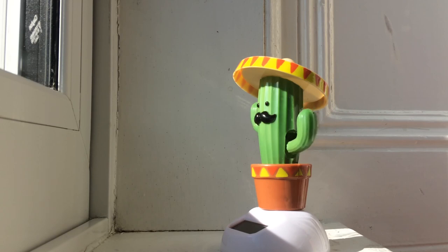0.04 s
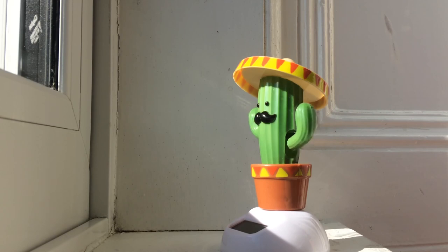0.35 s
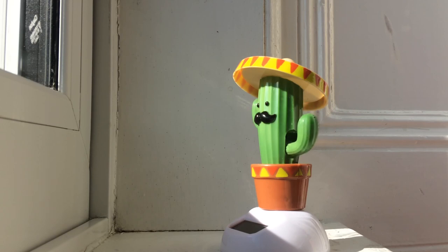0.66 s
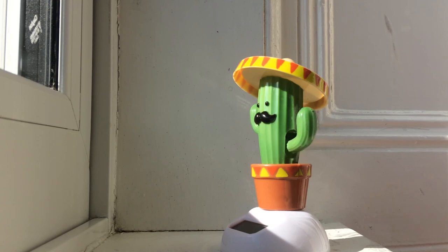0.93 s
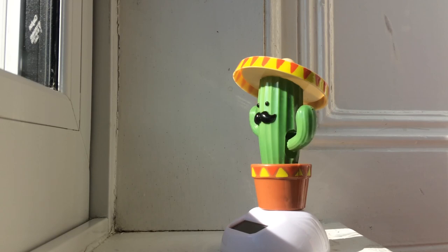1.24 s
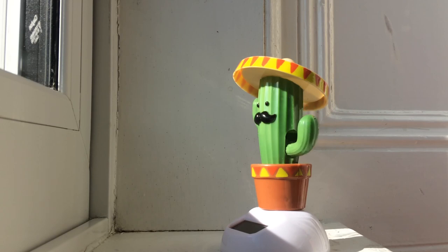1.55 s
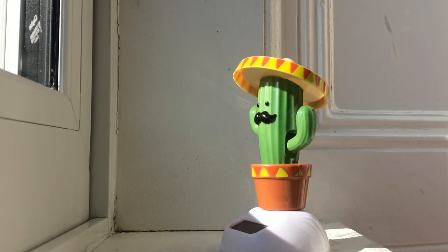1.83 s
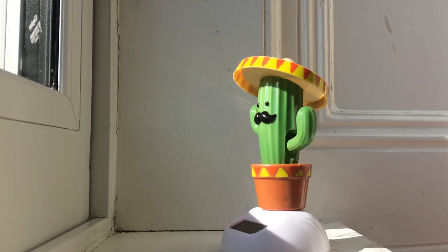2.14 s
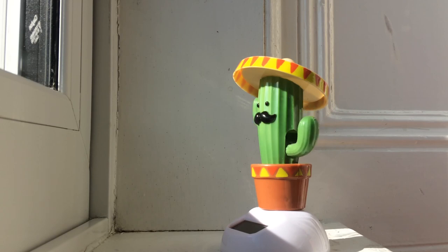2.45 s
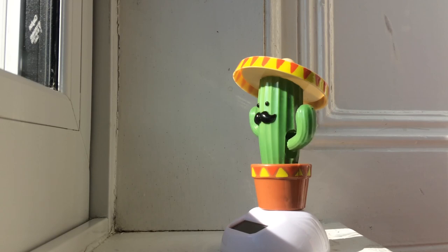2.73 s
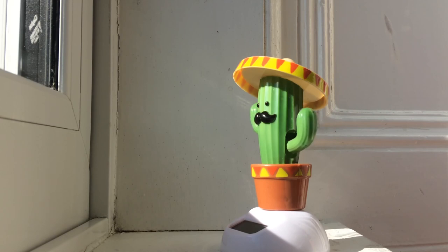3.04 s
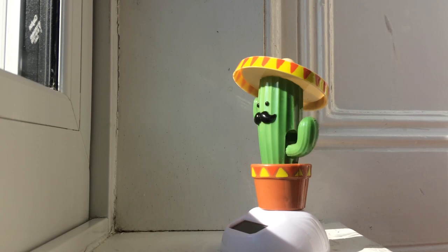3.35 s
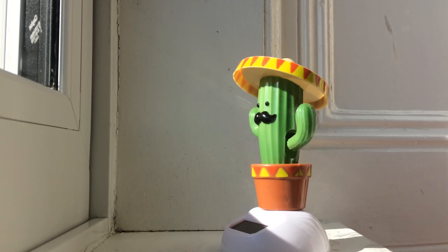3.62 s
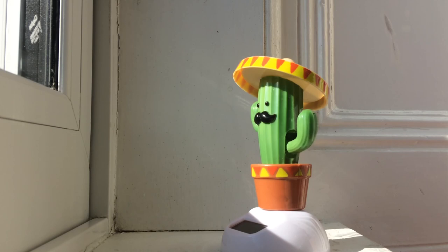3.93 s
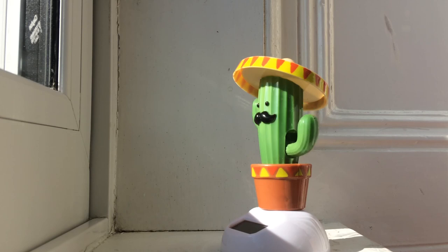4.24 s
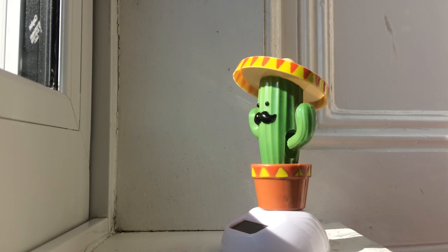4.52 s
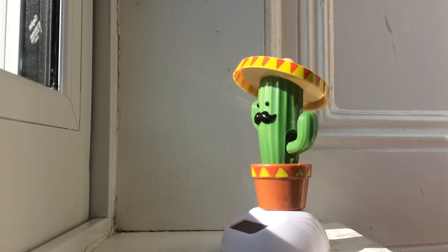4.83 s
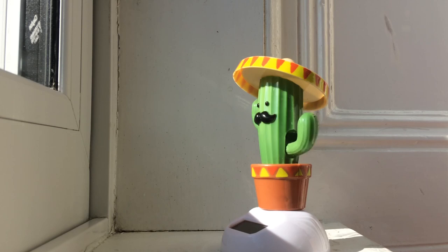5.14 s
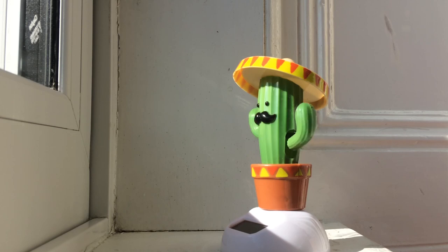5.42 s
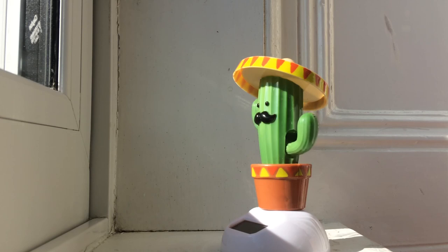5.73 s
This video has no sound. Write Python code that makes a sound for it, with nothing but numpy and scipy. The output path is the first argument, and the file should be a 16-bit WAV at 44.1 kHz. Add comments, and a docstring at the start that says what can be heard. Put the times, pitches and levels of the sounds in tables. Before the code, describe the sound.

A small solar-powered toy ticks on a windowsill in a quiet room, fairly close to the microphone. The light plastic clacks start at about 0.2 seconds and repeat evenly, a little over twice a second, each with a brief ring from the sill. Soft, low room tone lies underneath, and at first a faint drone and hiss come through an open doorway, gradually fading. Further off, from about 1.1 to 1.8 seconds, a door handle scrapes and rattles with metallic clicks, the sharpest near 1.7 seconds. At 2 seconds the door bumps its frame with a low boom and the metal latch immediately snaps home. This is the loudest moment, and the drone and hiss are gone. The door gives a faint, dull nudge around 2.7 seconds. The toy ticks on unchanged until the end, at about 6 seconds.

```python
"""A quiet room with a windowsill, where a solar dancing toy ticks a little over twice a second:
a coil kicks its pendulum, the plastic shell clacks and the sill rings on.
Further off a door is shut: the handle rattles, the leaf bumps its frame with a low boom and the
metal latch snaps home. Under it all sits soft room tone; a faint drone and hiss from beyond the
door fade as it closes."""
import sys
import numpy as np
from scipy import signal
from scipy.fft import rfft, irfft
from scipy.io import wavfile

SR = 44100
rng = np.random.default_rng(int(sys.argv[2]) if len(sys.argv) > 2 else 0)


def dump(signal):
    """Clip the signal to [-1, 1] and save it as 16-bit WAV at the path in sys.argv[1]."""
    limited = np.clip(np.atleast_2d(signal).T, -1, 1)
    pcm = np.round(limited * 32767).astype(np.int16)
    wavfile.write(sys.argv[1], SR, pcm)


N = 258867

# bass-heavy bed of the room (frequency [Hz], level [dB])
ROOM_TONE_EQ = [(15, -40.5), (25, -14), (75, 0), (106, -10), (135, -3.5), (224, -10), (257, -15),
                (383, -17.5), (415, -19.5), (691, -22), (856, -19.5), (927, -25), (1000, -21.5),
                (2070, -31.5), (15000, -41)]
# hiss through the doorway (frequency [Hz], level [dB])
HISS_EQ = [(200, -30), (500, 0), (900, -5), (1400, 2.5), (2300, -1), (3500, -10), (6500, -10.5),
           (9000, -21), (15000, -23)]
# reverb tail of the room (frequency [Hz], t60 [s])
ROOM_DECAY = [(100, 0.6), (300, 0.28), (700, 0.24), (1500, 0.3), (3000, 0.25), (6000, 0.26), (10000, 0.24),
              (15000, 0.21)]

# colour of a contact at the handle (frequency [Hz], level [dB])
HANDLE_EQ = [(60, -11.5), (170, -4.5), (350, -7), (500, -10), (850, 0.5), (1250, -2), (1520, -7.5),
             (2100, -7), (2700, -9), (4200, -17), (6500, -18.5), (8200, -29.5), (11000, -30), (15000, -37)]
# ring of the handle's metal (frequency [Hz], level [dB], t60 [s])
HANDLE_MODES = [(894, -22, 0.096), (1150, -19, .17), (1240, -13.5, 0.13), (1740, 3.5, 0.088),
                (1730, -6, 0.17), (2600, -25, 0.061), (2700, -13.5, .15), (3200, -9, 0.14),
                (3230, -14, 0.18), (3758, -18.5, 0.41), (4290, -23, 0.36), (4500, -13, 0.23),
                (5110, -20, 0.31), (5378, -20, .22), (6060, -18, 0.2), (6800, -28, 0.15)]
# light scrapes as the handle turns (time [s], level [dB], tilt [dB/octave])
HANDLE_SCRAPES = [(.062, -60, -2.5), (1.088, -62.5, -1.5), (1.118, -58, -3.5), (1.586, -53.5, -3),
                  (1.629, -69, 5.5)]
# sheen of a scrape (frequency [Hz], width [Hz], boost [dB])
SCRAPE_RESONANCES = [(955, 110, -2), (6160, 1700, 10), (12400, 3500, 14)]
# sharp metal clicks (time [s], level [dB], tilt [dB/octave], pitch of the struck part [Hz])
HANDLE_CLICKS = [(1.294, -48.5, -1.5, 2160), (1.690, -36.5, -0.54, 1726), (1.710, -45, -0.8, 1740),
                 (1.8, -49.5, 2, 3340)]
# dull rubs and nudges of the door leaf (time [s], level [dB], length [x room decay])
LEAF_RUBS = [(1.298, -55, 2), (1.409, -57.5, 0.73), (1.644, -55, 2), (2.61, -66.5, 3.7),
             (2.749, -56.5, 0.91)]
# body of a rub (frequency [Hz], width [Hz], boost [dB])
RUB_RESONANCES = [(389, 41, 9.5), (960, 41, 2)]

# the toy's plastic shell, swelling at each kick (frequency [Hz], level [dB], time to peak [s])
SHELL_PULSES = [(647, -39.5, 0.00403), (930, -47.5, 0.00407), (1275, -56, 0.00419), (1500, -61.5, 0.00351),
                (2217, -37.5, 0.0031), (2557, -45, 0.00414), (3626, -47, 0.003), (4080, -50.5, .0032),
                (4700, -59.5, 0.0043), (5200, -58.5, .0025), (6100, -59, .0023), (10120, -60.5, .0022),
                (13500, -61, .0016)]
# ring of the sill and window recess (frequency [Hz], level [dB], t60 [s])
SILL_MODES = [(357.4, -53.5, 0.15), (418, -57.5, 0.18), (515, -63.5, 0.12), (586, -73, 0.125),
              (723, -51.5, 0.15), (851, -51, 0.12), (965.4, -47.5, 0.095), (1190, -61.5, 0.11),
              (1381, -51, 0.077), (1566, -55.5, 0.055), (1797, -50.5, 0.054), (2243, -45, 0.031),
              (2526, -71.5, 0.3), (2546, -64, 0.1), (2543, -64, 0.16), (3800, -76, .07),
              (3863, -47.5, 0.036), (3900, -59, 0.04)]
# snap of each kick's first contact (frequency [Hz], level [dB], t60 [s])
SNAP_MODES = [(1450, -48, 0.0057), (2260, -43.5, .008), (4050, -44, 0.011)]
# early echoes off the sill, pane and side of the recess (delay [s], level [dB])
RECESS_ECHOES = [(.0064, -14.5), (.008, -24), (.012, -24), (.0172, -26.5), (.0235, -31.5)]
# the tick as scattered by the recess (frequency [Hz], level [dB])
SCATTER_EQ = [(150, -43), (400, -6), (800, -2), (1600, -8), (2400, 2), (3100, -4), (4100, 0.5),
              (5200, -12.5), (8000, -16), (10300, -23.5), (12000, -30), (15000, -28.5)]
# fine chatter of the toy's loose parts (frequency [Hz], level [dB])
CHATTER_EQ = [(800, -22), (2500, -2.5), (5000, 2), (8000, -8.5), (11000, -9), (15000, -12)]

# thud of the leaf on its frame (frequency [Hz], level [dB])
BUMP_EQ = [(88, -33), (150, -4.5), (210, -1.5), (280, -23), (350, -3.5), (430, -17), (700, -9.5),
           (820, -20), (1050, -7), (1300, -14.5), (2360, -14), (2600, -23.5), (6900, -27.5), (15000, -52)]
# boom of the leaf and the room's bass (frequency [Hz], level [dB], t60 [s])
LEAF_MODES = [(48.24, -20, 0.54), (79.5, -31, 0.65), (88.4, -21, 0.22), (112.5, -22, 0.31),
              (147.8, -29, 0.31), (163.2, -33, 0.34), (183.6, -30, 0.45), (230.3, -34.5, 0.36),
              (339.5, -28, .16)]
# crack of the latch (frequency [Hz], level [dB])
LATCH_EQ = [(120, -17), (300, -9.5), (430, -18.5), (600, -13), (1100, -13), (1370, -2.5), (2150, -16),
            (2400, -14.5), (3500, -21.5), (6700, -22.5), (8500, -34.5), (10200, -27.5), (11800, -37.5),
            (15000, -39)]
# ring of the latch's metal (frequency [Hz], level [dB], t60 [s])
LATCH_MODES = [(305, -28, 0.14), (866, -24, 0.06), (1236, -37, 0.17), (1208, -35.5, 0.14),
               (1288, -32.5, 0.23), (1377, -34, 0.29), (1400, -36, .24), (1477, -32.5, 0.28),
               (1630, -51, 0.225), (1810, -39, 0.31), (1950, -41, 0.23), (2370, -47, 0.075),
               (5420, -42, 0.16)]


def gain_of(db):
    """Decibels to amplitude."""
    return 10 ** (np.asarray(db) / 20)


def unit_rms(x):
    """Scales to rms 1."""
    return x / np.sqrt(np.mean(x ** 2) + 1e-20)


def curve_at(points, hz):
    """Reads a curve on a log-frequency axis."""
    f, value = np.transpose(points)
    return np.interp(np.log(hz + 1), np.log(f + 1), value)


def add(mix, s, sound):
    """Mixes a sound in at s seconds."""
    part = mix[round(s * SR):][:len(sound)]
    part += sound[:len(part)]


def noise(eq, size, tilt=0, peaks=()):
    """Noise of rms 1 shaped by an EQ, a tilt in dB/octave and peaks (Hz, width Hz, boost dB)."""
    hz = np.fft.rfftfreq(size, 1 / SR)
    db = curve_at(eq, hz) + tilt * np.log2(np.clip(hz, 400, 8000))
    for centre, width, boost in peaks:
        db = db + boost / (1 + (2 * (hz - centre) / width) ** 2)
    return unit_rms(irfft(rfft(rng.standard_normal(size)) * gain_of(db), size))


def swell(t, rise):
    """Smooth fade from 0 to 1 over rise seconds."""
    return np.sin(np.pi / 2 * np.clip(t / rise, 0, 1)) ** 2


def ring(modes, rise):
    """One second of dying modes, neighbours swinging in opposite polarity."""
    t = np.arange(SR) / SR
    partials = ((-1) ** k * gain_of(db - 60 * t / t60) * np.sin(2 * np.pi * hz * t)
                for k, (hz, db, t60) in enumerate(modes))
    return swell(t, rise) * sum(partials)


def far_blow(eq, db, rise, tilt=0, length=1, peaks=()):
    """A hit across the room: dense reflections build up, then each band dies at its own speed."""
    hz, t, bands = signal.stft(noise(eq, SR, tilt, peaks), SR, nperseg=256)
    t60 = length * curve_at(ROOM_DECAY, hz)[:, None]
    decay = gain_of(-60 * np.maximum(t - rise, 0) / t60)
    tail = signal.istft(bands * decay, SR, nperseg=256)[1][:SR]
    return gain_of(db) * swell(np.arange(SR) / SR, rise) * tail


def room_tone(db=-61):
    """A steady, dark bed of noise with a few low resonances."""
    peaks = [(89, 14, 7.4), (183.4, 43, 5.8), (384, 92, 3.2), (878, 400, 3.5)]
    return gain_of(db) * noise(ROOM_TONE_EQ, N, peaks=peaks)


def beyond_door(hiss_db=-73, drone_db=-52, drone_hz=159, width_hz=42, fade_db_per_s=8):
    """A hiss and a dying drone come through the doorway until the narrowing gap shuts them out."""
    t, hz = np.arange(N) / SR, np.fft.rfftfreq(N, 1 / SR)
    band = 1 / (1 + (2 * (hz - drone_hz) / width_hz) ** 4)
    drone = unit_rms(irfft(rfft(rng.standard_normal(N)) * band, N))
    drone *= gain_of(drone_db - fade_db_per_s * t)
    hiss = gain_of(hiss_db) * noise(HISS_EQ, N)
    swing_to_ajar = gain_of(-6 * swell(t - 0.71, rise=0.51))
    seal = 1 - swell(t - 1.87, rise=0.12)
    return swing_to_ajar * seal * (drone + hiss)


def handle_contact(db, rise, tilt, length, peaks, ring_db):
    """One distant knock and its metal ring; bright contacts ring the high modes more."""
    modes = [(hz, level + tilt * np.log2(hz / 700), t60) for hz, level, t60 in HANDLE_MODES]
    knock = far_blow(HANDLE_EQ, db, rise, tilt, length, peaks)
    return knock + gain_of(db + ring_db) * ring(modes, rise)


def handle_rattle():
    """The door is handled: the metal scrapes and clicks, and the leaf rubs."""
    out = np.zeros(N)
    for s, db, tilt in HANDLE_SCRAPES:
        scrape = handle_contact(db, 0.012, tilt, length=1.22, peaks=SCRAPE_RESONANCES, ring_db=-13)
        add(out, s, scrape)
    for s, db, tilt, hz in HANDLE_CLICKS:
        struck_part = (hz, 0.051 * hz, 13)  # a narrow 13 dB peak gives the click its pitch
        click = handle_contact(db, 0.0073, tilt, length=0.69, peaks=[struck_part], ring_db=-5.5)
        add(out, s, click)
    for s, db, length in LEAF_RUBS:
        rise = 0.011 * np.sqrt(length)  # longer rubs have a softer attack
        rub = handle_contact(db, rise, tilt=-7, length=length, peaks=RUB_RESONANCES, ring_db=0)
        add(out, s, rub)
    return out


def solar_toy(first_s=0.2262, period_s=0.46014, sharpness=6.7):
    """The coil kicks the pendulum evenly; the shell repeats one tick and only its chatter varies."""
    t = np.arange(SR) / SR

    def envelope(db, t60, rise):
        return gain_of(db - 60 * t / t60) * swell(t, rise)

    shell = np.zeros(SR)
    for hz, db, peak_s in SHELL_PULSES:
        pulse = (t / peak_s * np.exp(1 - t / peak_s)) ** sharpness
        shell += gain_of(db) * pulse * np.cos(2 * np.pi * hz * (t - peak_s))
    tick = shell + ring(SILL_MODES, rise=0.0083)
    add(tick, 0.0006, ring(SNAP_MODES, rise=0.00043))
    for delay, db in RECESS_ECHOES:
        add(tick, delay, -gain_of(db) * shell)
    tick += envelope(db=-53, t60=0.079, rise=0.00093) * noise(SCATTER_EQ, SR)
    room_wash = noise(SCATTER_EQ, SR, tilt=-7, peaks=[(2420, 520, 6)])
    tick += envelope(db=-68, t60=0.56, rise=0.02) * room_wash
    chatter_envelope = envelope(db=-54, t60=0.039, rise=0.0015)
    out = np.zeros(N)
    for s in np.arange(first_s, N / SR, period_s):
        add(out, s, tick + chatter_envelope * noise(CHATTER_EQ, SR))
    return out


def door_shut():
    """The leaf swings in, the bolt scrapes the plate, the leaf hits the frame, the latch springs in."""
    bolt_peaks = [(5860, 1230, 11.5), (13500, 4000, 6)]
    bump_peaks = [(478, 27, 11.9), (567, 14, 5.9), (1000, 110, 3.6)]
    latch_peaks = [(570, 29, 9.4), (686, 30, 4.1), (4290, 60, 5.7), (5810, 43, 4), (6890, 89, 8.6)]
    swing = far_blow(BUMP_EQ, db=-43.5, rise=0.05, tilt=-4, length=0.9)
    bolt = far_blow(BUMP_EQ, db=-35, rise=0.006, tilt=2.5, length=0.19, peaks=bolt_peaks)
    bump = far_blow(BUMP_EQ, db=-28.5, rise=0.015, peaks=bump_peaks)
    boom = ring(LEAF_MODES, rise=0.013)
    latch = far_blow(LATCH_EQ, db=-27, rise=0.012, tilt=-0.03, length=0.88, peaks=latch_peaks)
    out = np.zeros(N)
    add(out, 1.968, swing)
    add(out, 1.992, bolt)
    add(out, 1.997, bump)
    add(out, 1.998, boom)
    add(out, 2.065, latch)
    add(out, 2.067, ring(LATCH_MODES, rise=0.0063))
    add(out, 2.108, gain_of(-8.5) * boom)  # the leaf settles back on the latch
    return out


def scene():
    """Room, toy and door in one mono mix."""
    return (room_tone() + beyond_door() + handle_rattle() + solar_toy() + door_shut())[None]


def record(dry):
    """A steep high cut at 15.4 kHz trims the air off the top."""
    high_cut = signal.firwin(511, 15400, window=("kaiser", 9), fs=SR)
    return signal.oaconvolve(dry, high_cut[None], "same")


dry = scene()
out = record(dry)
dump(out)
```